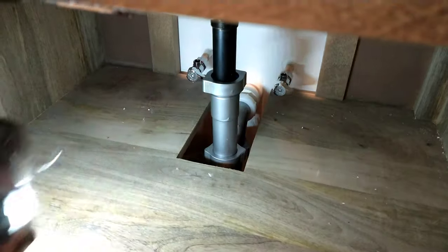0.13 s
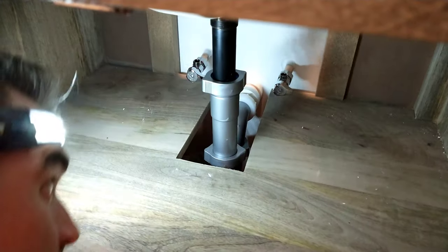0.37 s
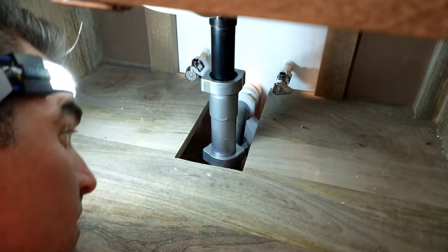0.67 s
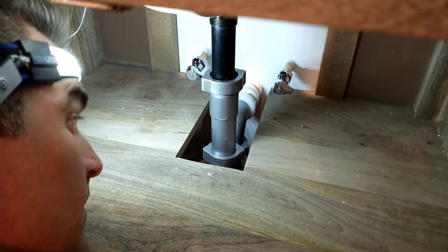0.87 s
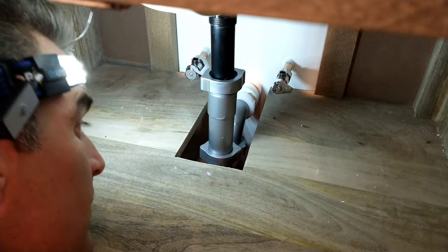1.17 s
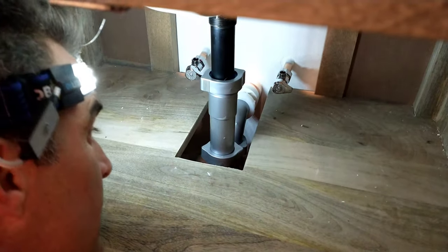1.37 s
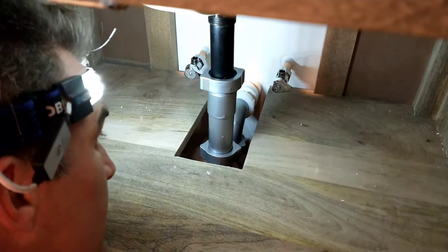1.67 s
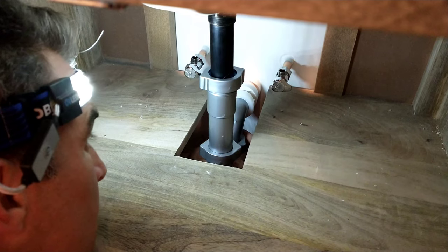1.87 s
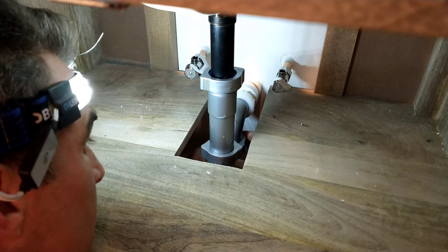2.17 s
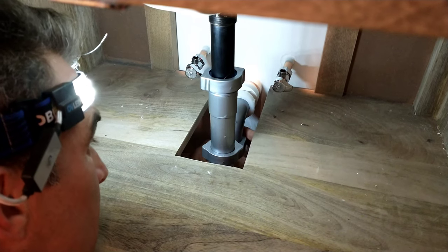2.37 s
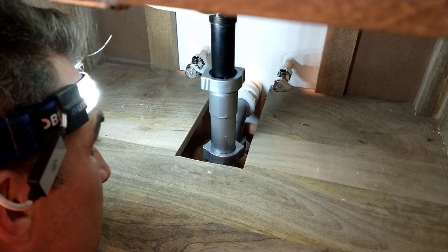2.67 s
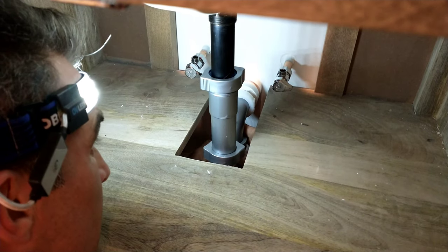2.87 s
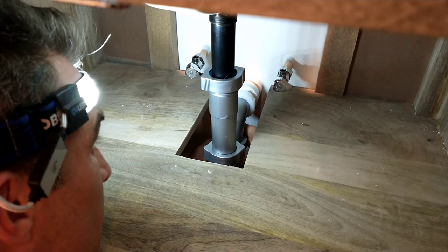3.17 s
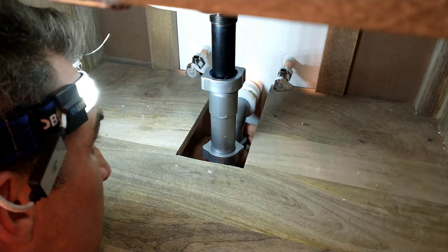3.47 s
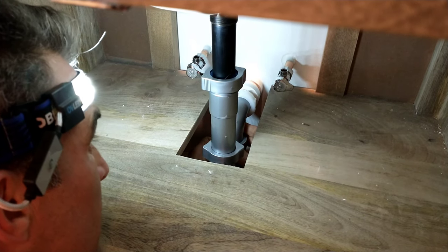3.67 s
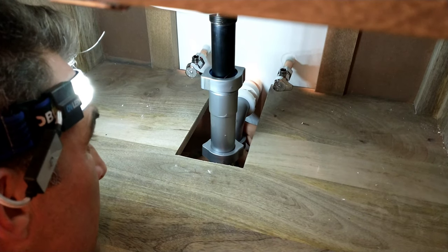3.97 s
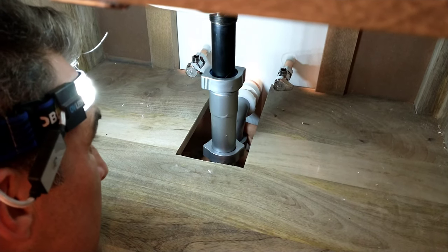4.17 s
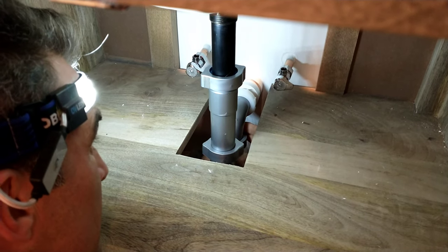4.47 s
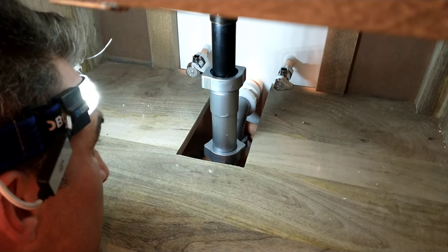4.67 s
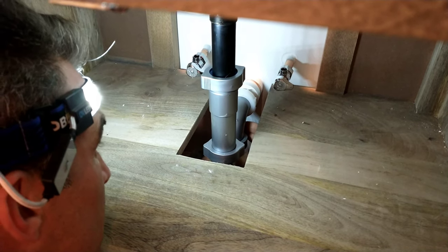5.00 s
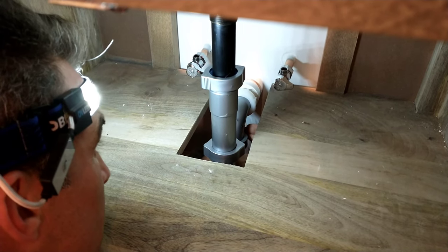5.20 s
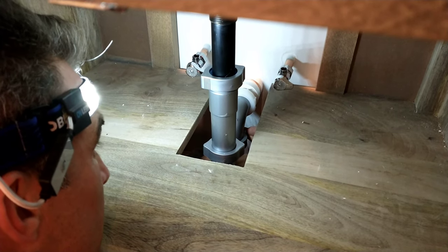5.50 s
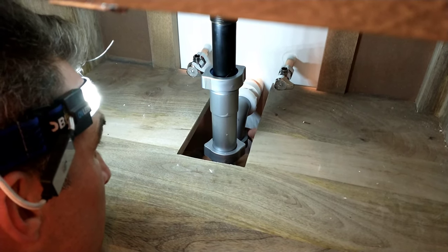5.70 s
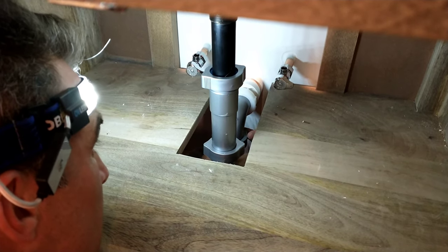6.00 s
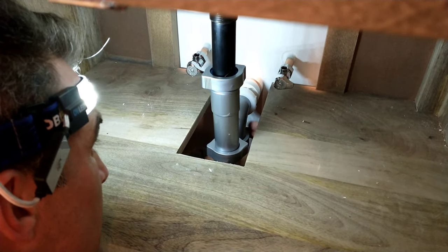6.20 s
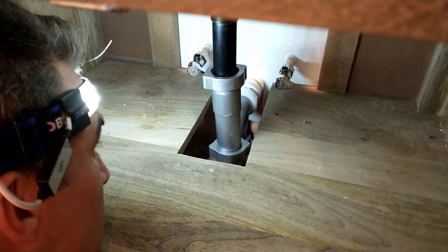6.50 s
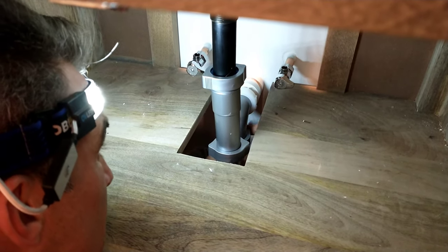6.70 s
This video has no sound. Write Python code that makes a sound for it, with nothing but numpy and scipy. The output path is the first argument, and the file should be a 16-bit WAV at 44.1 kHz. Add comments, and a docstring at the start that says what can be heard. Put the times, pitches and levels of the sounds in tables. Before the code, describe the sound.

Close, dry and boxy, inside a wooden cabinet with faint steady room noise. From 0 s a reaching arm scuffs wood and rustles cloth, with a small bright tick at the start. Around 0.4 s a plastic click lands with hollow knocks and a low boom; at 0.74 s comes the sharpest plastic clack, ringing briefly. Rubbing continues, and at 1.15-1.45 s heavier thumps flex the floor panel, the strongest at 1.2 s, with scrapes and a crisp tick. From 1.5 to 2.1 s the movement fades through softer bumps. A tiny squeak slips out near 2.35 s. Afterwards it is much quieter: short gritty hand strokes and faint plastic ticks as the nut turns, a muffled knock near 3 s, and a cluster of soft knocks between 4 and 5.2 s. A near lull follows about 5.6-6.2 s, then light bumps and a slightly stronger scuff and low thud around 6.7 s.

```python
"""Plastic drain pipes click, scrape and tick as they are fitted by hand inside a wooden cabinet, heard close up.
Clicks are short bursts of noise shaped by pipe resonances; the nut adds small slips and one short squeak.
Knocks on the wood are dying tones with a rattle, and pushes on the floor panel are low swelling tones.
Cloth and hand rub as grainy noise, first in a long reach, then in short strokes while the nut is turned.
The small sounds get a short boxy echo, and a faint steady room noise lies behind everything."""
import sys
import numpy as np
from scipy import signal
from scipy.fft import rfft, irfft, next_fast_len
from scipy.io import wavfile
from scipy.ndimage import uniform_filter1d, map_coordinates

SR = 44100
rng = np.random.default_rng(int(sys.argv[2]) if len(sys.argv) > 2 else 0)


def store_pcm(level_fs):
    """Save levels as 16-bit WAV."""
    pcm = np.round(np.clip(level_fs, -1, 1) * 32767).astype(np.int16)
    wavfile.write(sys.argv[1], SR, np.atleast_2d(pcm).T)


N = 302085
AFTER_S = np.arange(SR // 2) / SR  # time after a contact, in seconds

# light contacts of plastic on plastic: (t/s, pipe ring level/dB, pitch of the struck spot f/Hz, bright tick level/dB)
PLASTIC_CONTACTS = [(0.0137, -70, 2810, -40), (0.377, -35, 940, -38.5), (0.42, -45, 1130, -49),
                    (0.7388, -27.5, 2310, -31.5), (0.7411, -27.5, 2330, -36), (0.7688, -39.5, 2130, -38),
                    (1.174, -55, 1500, -63), (1.205, -42, 1290, -62), (1.331, -57, 1940, -42.5),
                    (1.377, -51, 1890, -50), (1.441, -74, 1460, -67), (2.025, -81, 1730, -67.5),
                    (2.345, -66, 2350, -66.5), (2.644, -63, 1510, -77), (2.761, -70, 1860, -79),
                    (2.961, -59, 1450, -74.5), (3.2638, -62.5, 2460, -67), (3.607, -68.5, 1535, -68.5),
                    (3.677, -74, 1725, -69.5), (3.969, -49, 1490, -63), (3.975, -49, 1424, -80),
                    (4.139, -62.5, 1940, -69), (4.3063, -60.5, 1930, -65), (4.329, -47, 1990, -74),
                    (4.374, -61.5, 1580, -82), (4.504, -68, 1420, -86), (4.631, -50, 2060, -61.5),
                    (4.6753, -56.5, 1640, -63), (4.699, -66, 1490, -67), (4.8641, -48.5, 2010, -66),
                    (5.1414, -61, 1427, -63), (5.2255, -74.5, 1600, -73), (5.843, -75, 1110, -97.5),
                    (6.212, -61, 1260, -73), (6.375, -65, 1980, -67.5), (6.705, -59, 1100, -87),
                    (6.821, -72, 2100, -74)]
# resonances of the pipes: (f/Hz, width/Hz, level/dB)
PIPE_RESONANCES = [(554, 160, -6), (850, 230, 2.5), (1080, 110, 0.5), (1180, 250, 0), (1430, 70, -5),
                   (1823, 110, -2.5), (1980, 50, -3), (2164, 41, -1), (2310, 190, 1.5), (2490, 150, -4),
                   (2790, 120, -8.5), (3070, 230, -7), (3520, 240, -9.5), (4600, 450, -7), (6150, 440, -14)]
# colour of the bright tick: (f/Hz, level/dB per Hz)
TICK_COLOUR = [(1000, -33.5), (3000, -3.5), (5000, -1), (6500, -2.5), (8000, -6), (11000, -6),
               (12500, -12.5), (15000, -14)]
# the nut squeaks once as it slips on its thread: (f/Hz, level/dB)
SQUEAK_TONES = [(1850, -57), (2450, -54), (4900, -69)]
SQUEAK_PEAK_S, SQUEAK_RISE_S, SQUEAK_T60_S = 2.349, 0.05, 0.045  # peak time, time to grow by 60 dB, decay by 60 dB

# blows on the cabinet: (t/s, hollow body level/dB, wooden clack level/dB before a common trim)
CABINET_BLOWS = [(0.376, -30, -22), (0.423, -32.5, -39), (0.739, -39, -35), (1.147, -30, -40),
                 (1.207, -22.5, -33.5), (1.333, -35, -46.5), (1.424, -41.5, -42), (1.829, -45, -48),
                 (1.933, -49, -59), (2.012, -61, -58), (2.645, -64.5, -66), (2.968, -38, -50),
                 (3.968, -53, -55), (4.375, -38.5, -52.5), (4.634, -44.5, -57), (4.876, -39.5, -50.5),
                 (5.063, -53, -62), (5.143, -53.5, -71.5), (5.531, -54, -67), (6.217, -53, -64),
                 (6.259, -51.5, -65.5), (6.377, -59, -62.5), (6.72, -44.5, -53)]
# tones of the hollow box: (f/Hz, level/dB, time to fall by 60 dB t60/s)
BOX_TONES = [(133, -2.5, .16), (180.3, -0.5, 0.14), (229, -7, 0.13), (324, -7, 0.061)]
# tones of the cabinet's boards: (f/Hz, level/dB, time to fall by 60 dB t60/s)
BOARD_TONES = [(346, -11, 0.19), (436, 0.5, 0.12), (468, -8, .13), (563, -3, 0.18), (635, -8.5, 0.15),
               (680, -10.5, 0.056), (726, -8.5, 0.055), (826, -6.5, .045), (975, -12, 0.032),
               (1330, -20, 0.11)]
REBOUND_S, REBOUND_DB = 0.03, -5.5  # delay and level of the second, softer bump after every blow

# soft pushes that flex the floor panel: (start t/s, peak level/dB before a common trim, f/Hz)
PANEL_PUSHES = [(0.413, -24.5, 126.3), (0.483, -23.5, 83), (0.95, -30.5, 93.3), (1.152, -24.5, 126),
                (1.204, -13, 85), (1.332, -27.5, 94), (1.424, -27.5, 101), (1.472, -30, 86),
                (1.848, -33.5, 94), (2.009, -40.5, 89.5), (2.085, -40.5, 93), (2.398, -36.5, 93),
                (2.678, -41.5, 94.2), (2.783, -45.5, 89.4), (2.857, -37.5, 86), (2.956, -33.5, 115),
                (3.257, -44.5, 86.1), (3.908, -40, 84), (4.066, -42.5, 107), (4.16, -34, 96.3),
                (4.202, -33.5, 89), (4.268, -39.5, 97), (4.384, -39.5, 86), (4.68, -35, 90.3),
                (4.775, -32, 89), (4.863, -33.5, 101), (5.185, -43.5, 74), (5.526, -46.5, 104),
                (6.721, -29.5, 83.6), (6.753, -30, 98.5), (6.812, -43.5, 89.9)]
SWELL_S = 0.019  # time the panel takes to reach its widest swing

# the sleeve slides over the edge of the opening as the arm reaches in: (t/s, sliding level/dB)
ARM_REACH = [(0.0, -54.5), (0.15, -60), (0.44, -63.5), (0.68, -55.5), (0.88, -53.5), (1.23, -51.5),
             (1.34, -59.5), (1.49, -60.5), (1.62, -69), (1.95, -72), (2.13, -78), (2.3, -82.5)]
REACH_SURFACES_DB = [6.5, 0, -1]  # what the reach gives on wood, plastic, cloth
REACH_STOP_T60_S = 1  # the arm comes to rest: time to fall by 60 dB
# weight of the arm on the floor panel: (t/s, rumble level/dB)
ARM_WEIGHT = [(0.0, -43), (0.23, -48), (0.53, -46), (0.99, -49.5), (1.35, -37.5), (1.6, -56.5),
              (1.81, -56.5), (2.0, -50.5), (2.42, -59.5), (2.71, -62), (2.88, -55.5), (3.34, -68),
              (3.66, -66.5), (4.1, -52), (4.67, -62), (4.84, -54), (5.72, -75.5), (6.85, -61.5)]
REST_SURFACES_DB = [-76.5, -83, -83]  # the resting hand creeps on wood, plastic, cloth, at mean weight
REST_DB_PER_DB = 0.5  # more weight, more creep
# single strokes of the hand, first reaching, then turning the nut:
# (start t/s, length/s, on wood level/dB, on plastic level/dB, cloth level/dB)
HAND_STROKES = [(0, 0.15, -41.5, -52.5, -87), (0.012, 0.017, -61, -63.5, -42.5),
                (0.494, 0.031, -45, -54, -55), (0.646, 0.23, -48.5, -55, -47), (0.94, .2, -46, -45, -53.5),
                (1.139, .06, -43, -45, -68), (1.193, .03, -32, -45.5, -61),
                (1.255, 0.091, -50.5, -41, -44.5), (1.422, 0.055, -43.5, -59, -74),
                (1.497, 0.16, -54, -65, -63), (1.837, .11, -56.5, -76.5, -64.5),
                (2.031, 0.14, -59.5, -72.5, -74), (2.383, .17, -75, -77.5, -82),
                (2.613, .08, -64, -73.5, -78), (2.752, 0.045, -69.5, -72.5, -79),
                (2.871, .07, -66.5, -80.5, -80), (2.971, 0.1, -62.5, -81, -78),
                (3.229, 0.088, -65.5, -87, -78), (3.579, 0.11, -65, -86, -87),
                (3.784, 0.099, -64, -71.5, -70), (3.94, 0.088, -56, -69, -67),
                (4.139, 0.0545, -58.5, -70, -86), (4.258, 0.061, -67, -84, -81),
                (4.374, 0.065, -67.5, -69, -72.5), (4.617, 0.11, -55.5, -70.5, -78.5),
                (4.789, 0.037, -67, -70.5, -78.5), (4.892, 0.085, -64.5, -70.5, -84),
                (5.151, 0.15, -75.5, -84, -83), (6.204, 0.078, -61, -75, -84), (6.29, .045, -62, -66, -78),
                (6.41, 0.11, -83, -84, -81.5), (6.616, 0.14, -65, -72, -81),
                (6.695, 0.053, -52.5, -54.5, -73), (6.772, 0.098, -63, -75, -82)]
# part of the length spent speeding up, loss by its end, time to fall by 60 dB after letting go
STROKE_RISE_SHARE, STROKE_SAG_DB, STROKE_T60_S = 0.26, 2, 0.15

# colour of the panel's rumble under the arm: (f/Hz, level/dB per Hz)
RUMBLE_COLOUR = [(20, -26), (45, -24), (66, -0.5), (85, -0.5), (130, -6.5), (170, -8.5), (240, -17.5),
                 (800, -56)]
# colour of rough wood, rubbed or rattling: (f/Hz, level/dB per Hz)
WOOD_COLOUR = [(150, -26), (290, -2), (400, -1.5), (500, 2.5), (640, -1.5), (800, -6.5), (1500, -16),
               (2500, -24), (6000, -44.5)]
# resonances of the air in the cabinet: (f/Hz, width/Hz, level/dB)
CABINET_AIR = [(590, 240, 0.5), (955, 130, -1.5), (1333, 77, 1), (1460, 47, 0.5), (1803, 150, -0.5),
               (2075, 180, -3.5), (3100, 1700, -7)]
# colour of rustling cloth: (f/Hz, level/dB per Hz)
CLOTH_COLOUR = [(1000, -24), (2200, -11.5), (3500, -0.5), (5000, 1.5), (8000, 1), (11000, -1), (12500, -6),
                (15000, -9)]
# colour of the room's background noise: (f/Hz, level/dB per Hz)
ROOM_COLOUR = [(20, -16), (85, -3), (240, -14), (520, -27), (1700, -39), (10000, -45), (15000, -48.5)]


def clicks(creep_db=-15, creep_s=0.011):
    """The plastic creeps for a moment, then lets go: the pipes ring and the edge gives a short bright tick."""
    track = np.zeros(N)
    for s, pipe_db, hz, bright_db in PLASTIC_CONTACTS:
        colour = spot(hz, octaves=0.95)
        hollow = coloured(contact(t60=0.045, tail_db=-18.5, tail_t60=0.15, direct=0.98), colour)
        tick = coloured(contact(t60=0.043, tail_db=-22, tail_t60=0.3, direct=3.3), slope(TICK_COLOUR))
        add(track, s, amp(pipe_db) * struck(hollow) + amp(bright_db) * struck(tick))

        # the creep grows steadily and ends at the click
        swell = np.linspace(0, 1, round(creep_s * SR))
        creep = unit(coloured(rng.standard_normal(len(swell)), colour)) * swell
        add(track, s - creep_s, amp(pipe_db + creep_db) * creep)
    return track


def spot(centre_hz, octaves):
    """The pipes' resonances, strongest around the pitch of the struck spot."""
    def gain(hz):
        distance = np.log2((hz + 1) / centre_hz) / octaves
        return resonances(PIPE_RESONANCES)(hz) / (1 + distance ** 2)
    return gain


def thread(scrape, rate=22, spread_db=4, level_db=-6):
    """Stray little slips of the nut (rate per second) tick in the pipes, as hard as the plastic is scraped."""
    strength = amp(spread_db * np.clip(rng.standard_normal(N), -2, 2))
    slips = (rng.random(N) < rate / SR) * strength
    one_tick = contact(t60=0.027, tail_db=-24.5, tail_t60=0.1, direct=4)
    ticks = signal.fftconvolve(unit(slips) * scrape, one_tick)[:N]
    ticks = coloured(ticks, resonances(PIPE_RESONANCES))
    scrape_rms = np.sqrt(np.mean(scrape ** 2))
    return amp(level_db) * unit(ticks) * scrape_rms


def squeak(waver=0.04):
    """Plastic chatters on plastic: a few unsteady tones grow quickly and die as the nut lets go."""
    t = np.arange(N) / SR - SQUEAK_PEAK_S
    envelope = amp(-60 * np.maximum(-t / SQUEAK_RISE_S, t / SQUEAK_T60_S))
    tones = np.zeros(N)
    for hz, db in SQUEAK_TONES:
        pitch = hz * (1 + waver * wobble(500))
        tones += amp(db) * np.sin(2 * np.pi * np.cumsum(pitch) / SR)
    return envelope * tones


def knocks(clack_db=-1, rattle_db=-5):
    """A blow rings the hollow box and its boards, with a rough noisy rattle, and rebounds softly."""
    track = np.zeros(N)
    for s, low_db, wood_db in CABINET_BLOWS:
        body = ring(BOX_TONES, scatter_db=1.0, attack=0.00051)
        boards = ring(BOARD_TONES, scatter_db=3.5, attack=0.0004)
        rattle = contact(t60=0.14, tail_db=-12, tail_t60=0.63, direct=2.5)
        rattle = struck(coloured(rattle, slope(WOOD_COLOUR)))
        clack = boards + amp(rattle_db) * rattle
        add(track, s, amp(low_db) * body + amp(wood_db + clack_db) * clack)
        rebound = ring(BOX_TONES, scatter_db=4.0, attack=0.002)
        add(track, s + REBOUND_S, amp(low_db + REBOUND_DB) * rebound)
    return track


def booms(level_db=-1):
    """The floor panel swells and dies at one low tone, whose pitch differs from push to push."""
    track = np.zeros(N)
    u = AFTER_S / SWELL_S
    swell = (u * np.exp(1 - u)) ** 2
    for s, db, hz in PANEL_PUSHES:
        add(track, s, amp(db + level_db) * swell * np.sin(2 * np.pi * hz * AFTER_S))
    return track


def sliding():
    """Strength of friction on wood, plastic and cloth: reaching arm, resting hand and strokes, summed as power."""
    stopped = np.maximum(np.arange(N) / SR - ARM_REACH[-1][0], 0)
    reach_db = curve(ARM_REACH) - 60 * stopped / REACH_STOP_T60_S
    weight_db = curve(ARM_WEIGHT)
    rest_db = REST_DB_PER_DB * (weight_db - weight_db.mean())
    moves = [(REACH_SURFACES_DB, amp(reach_db)), (REST_SURFACES_DB, amp(rest_db))]
    moves += [(surfaces_db, stroke(start, length)) for start, length, *surfaces_db in HAND_STROKES]
    return np.sqrt(sum(np.outer(amp(surfaces_db) ** 2, gain ** 2) for surfaces_db, gain in moves))


def stroke(start, length):
    """Gain of one stroke: the hand speeds up, slows a little and lets go."""
    t = np.arange(N) / SR - start
    done = np.clip(t / length, 0, 1)
    rise = np.minimum(done / STROKE_RISE_SHARE, 1)
    release_db = -60 * np.maximum(t - length, 0) / STROKE_T60_S
    return rise * amp(release_db - STROKE_SAG_DB * done)


def rubbing(scuff, scrape, hiss, wood_db=-1):
    """Sleeve and hand slide over wood and plastic while the arm's weight works the panel."""
    rumble = friction(rate=52, grain_share=0.13, patchy_db=1.0)
    rumble = unit(coloured(rumble, slope(RUMBLE_COLOUR)))
    on_wood = friction(rate=240, grain_share=0.2, patchy_db=1.5)
    on_wood = unit(coloured(on_wood, slope(WOOD_COLOUR)))
    on_plastic = shifting(friction(rate=330, grain_share=0.28, patchy_db=0), depth_db=2)
    on_plastic = unit(coloured(on_plastic, resonances(CABINET_AIR)))
    cloth = shifting(friction(rate=1000, grain_share=0.27, patchy_db=1.44), depth_db=1.0)
    cloth = unit(coloured(cloth, slope(CLOTH_COLOUR)))
    low = amp(curve(ARM_WEIGHT)) * rumble + amp(wood_db) * scuff * on_wood
    return low + scrape * on_plastic + hiss * cloth


def friction(rate, grain_share, patchy_db):
    """Tiny slips of uneven size (rate per second) on smooth sliding noise, under a wavering pressure."""
    slips = (rng.random(N) < rate / SR) * rng.standard_normal(N)
    smooth = rng.standard_normal(N)
    force = np.sqrt(grain_share) * unit(slips) + np.sqrt(1 - grain_share) * smooth
    return force * amp(patchy_db * wobble(45))


def shifting(x, depth_db):
    """The colour of a rub drifts as the contact patch moves: random gains, smoothed over pitch and time."""
    z = signal.stft(x, nperseg=512)[2]
    field = uniform_filter1d(rng.standard_normal(z.shape), size=12, axis=0)
    field = uniform_filter1d(field, size=12, axis=1)
    return signal.istft(z * amp(depth_db * unit(field)), nperseg=512)[1][:N]


def cabinet(x, wet_db=-13, t60=0.047):
    """Close wooden walls give every small sound the same short, boxy answer, a fading burst of noise."""
    walls = rng.standard_normal(len(AFTER_S)) * amp(-60 * AFTER_S / t60)
    walls *= AFTER_S > 0.002  # the first echo comes after 2 ms
    echo = signal.fftconvolve(x, walls / np.linalg.norm(walls))[:N]
    return (x + amp(wet_db) * echo) / np.sqrt(1 + amp(wet_db) ** 2)


def room(level_db=-69):
    """The faint steady air of the bathroom, as coloured noise."""
    return amp(level_db) * unit(coloured(rng.standard_normal(N), slope(ROOM_COLOUR)))


def contact(t60, tail_db, tail_t60, direct):
    """A sharp impulse, its dense reflections in the cabinet and a weak longer tail."""
    fade = amp(-60 * AFTER_S / t60) + amp(tail_db - 60 * AFTER_S / tail_t60)
    burst = rng.standard_normal(len(AFTER_S)) * fade
    burst[0] += direct
    return burst


def ring(modes, scatter_db, attack):
    """Wood rings in several dying tones, at new strengths for every blow."""
    total = np.zeros(len(AFTER_S))
    for hz, db, t60 in modes:
        sign = rng.choice([-1, 1])
        level = amp(db + scatter_db * rng.normal() - 60 * AFTER_S / t60)
        total += sign * level * np.sin(2 * np.pi * hz * AFTER_S)
    return struck(total * (1 - np.exp(-AFTER_S / attack)))


def resonances(peaks):
    """Gain of a set of (f/Hz, width/Hz, level/dB) resonances, summed as power."""
    def gain(hz):
        power = 0
        for c, width, db in peaks:
            power = power + np.abs(amp(db) * hz * width / (c * c - hz * hz + 1j * hz * width)) ** 2
        return np.sqrt(power)
    return gain


def slope(points):
    """Gain through (f/Hz, level/dB) points, joined by straight lines on a log pitch axis."""
    f, db = np.transpose(points)
    return lambda hz: amp(np.interp(np.log(hz + 1), np.log(f), db))


def coloured(x, gain):
    """x through a filter with the strength gain(Hz) that responds only after the input (minimum phase)."""
    m = 2 * next_fast_len(len(x) // 2 + 4096)
    strength = np.maximum(gain(np.fft.rfftfreq(m, 1 / SR)), 1e-6)
    cepstrum = irfft(np.log(strength))
    # folding the second half onto the first keeps the response from starting early
    cepstrum[1:m // 2] *= 2
    cepstrum[m // 2 + 1:] = 0
    return irfft(rfft(x, m) * np.exp(rfft(cepstrum)))[:len(x)]


def curve(rows):
    """One value per sample along (t/s, value) points."""
    return np.interp(np.arange(N) / SR, *np.transpose(rows))


def wobble(rate):
    """A smooth random curve through rate random points a second."""
    points = rng.standard_normal(int(N * rate / SR) + 4)
    return map_coordinates(points, [np.arange(N) * rate / SR])


def amp(db):
    """Decibels to a plain factor."""
    return 10 ** (np.asarray(db) / 20)


def unit(x):
    """Scaled to rms 1."""
    return x / np.sqrt(np.mean(x ** 2) + 1e-20)


def struck(x):
    """Scaled to rms 1 over its first fiftieth of a second."""
    return x / np.sqrt(np.mean(x[:SR // 50] ** 2) + 1e-20)


def add(track, s, sound):
    """Mix a sound into the track at time s, cut off at the track's end."""
    part = track[max(round(s * SR), 0):][:len(sound)]
    part += sound[:len(part)]


def scene():
    """The small sounds echo in the box; knocks, booms and room noise are added directly."""
    scuff, scrape, hiss = sliding()
    small = clicks() + thread(scrape) + squeak() + rubbing(scuff, scrape, hiss)
    return (cabinet(small) + knocks() + booms() + room())[None]


def record(dry, bass_hz=48, top_hz=15800):
    """The deepest bass is weakened to about 0.6, and nothing is kept from top_hz upwards."""
    m = next_fast_len(N + SR // 2)
    hz = np.fft.rfftfreq(m, 1 / SR)
    bass_cut = 1 - 0.41 / (1 + (hz / bass_hz) ** 8)
    return irfft(rfft(dry, m) * bass_cut * (hz < top_hz), m)[:, :N]


dry = scene()
out = record(dry)
store_pcm(out)
```